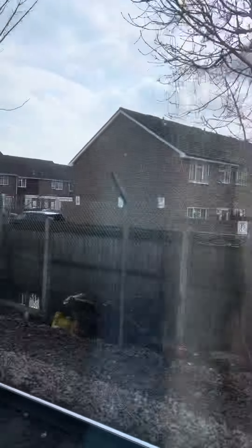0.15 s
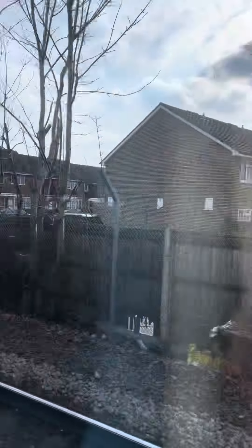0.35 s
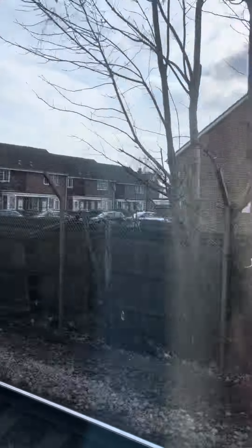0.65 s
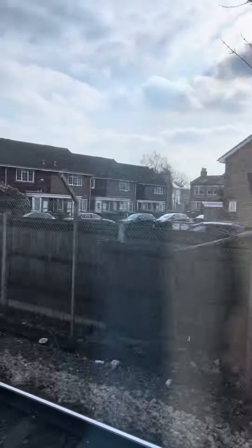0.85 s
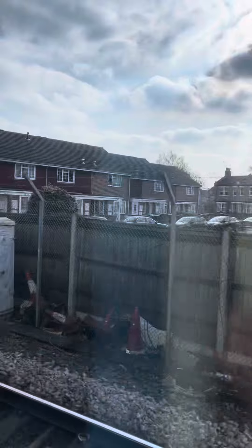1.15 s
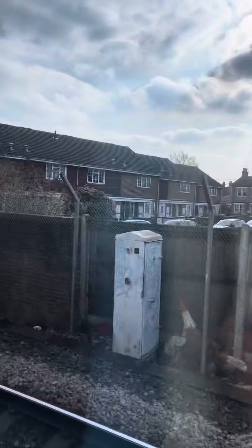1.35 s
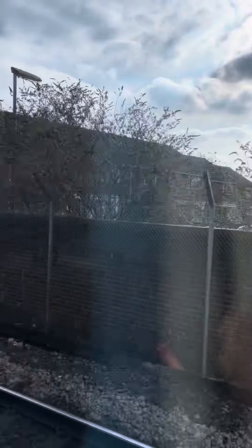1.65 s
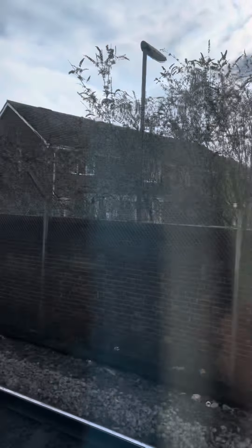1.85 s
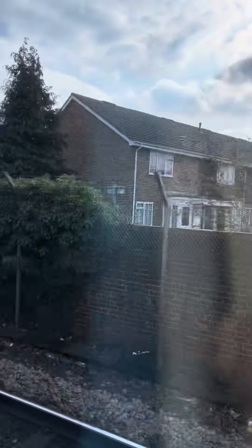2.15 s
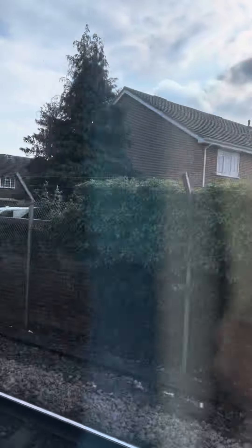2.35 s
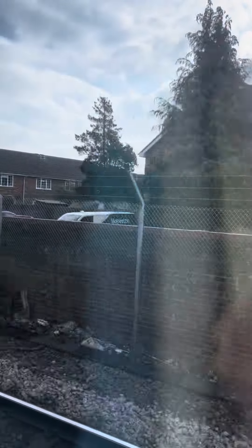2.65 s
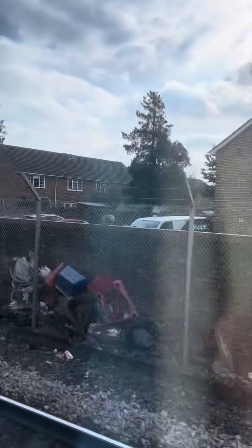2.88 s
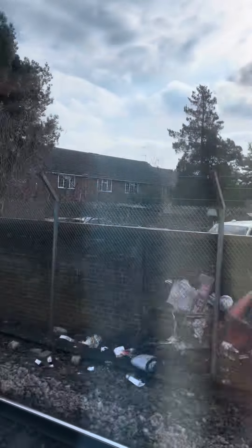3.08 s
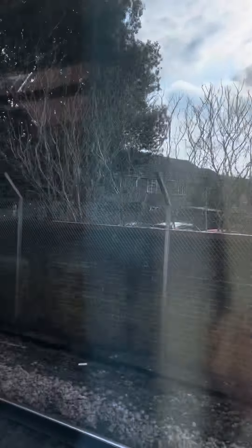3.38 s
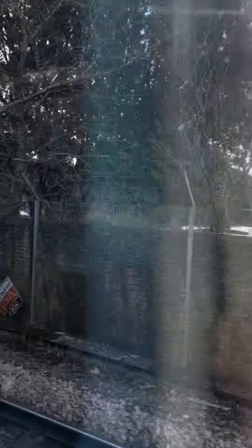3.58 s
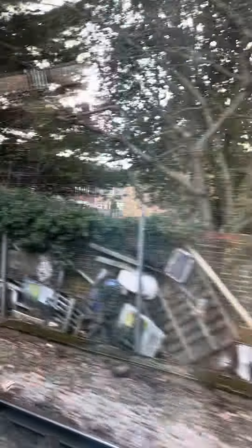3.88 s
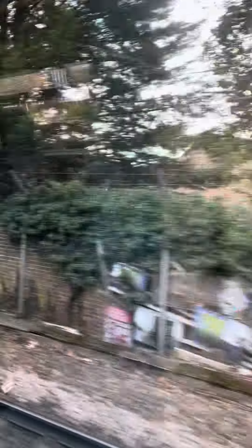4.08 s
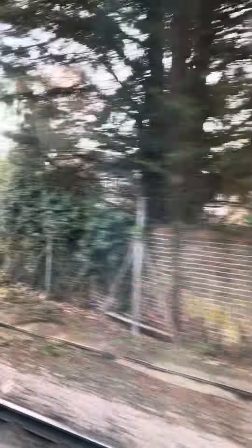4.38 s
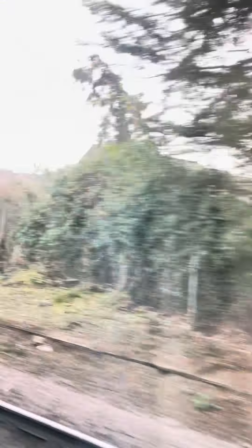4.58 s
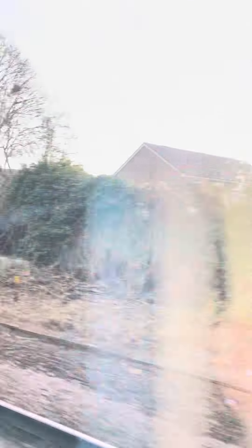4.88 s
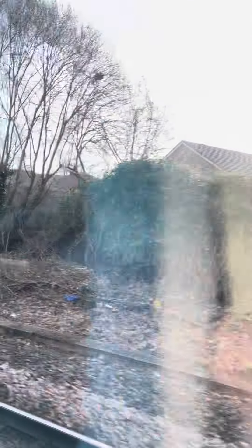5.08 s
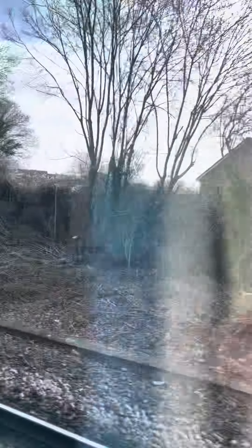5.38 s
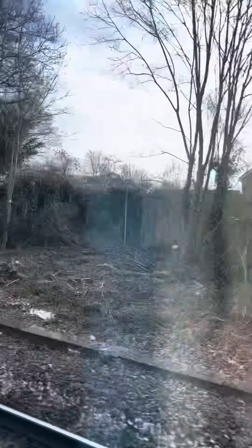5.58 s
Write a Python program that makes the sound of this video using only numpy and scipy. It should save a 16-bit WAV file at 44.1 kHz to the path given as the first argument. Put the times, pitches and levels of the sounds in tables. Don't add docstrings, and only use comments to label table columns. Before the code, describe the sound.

Low, steady rumble and muffled roar inside a moving train carriage, with soft rail-joint thuds, faint air hiss and a latch-like clack at the end.

```python
import sys
import numpy as np
from scipy import signal
from scipy.fft import irfft, next_fast_len
from scipy.io import wavfile
from scipy.ndimage import uniform_filter1d

SR = 44100
rng = np.random.default_rng(int(sys.argv[2]) if len(sys.argv) > 2 else 0)


def persist_wave(psi):
    counts = np.round(np.clip(psi, -1, 1) * 32767).astype(np.int16)
    wavfile.write(sys.argv[1], SR, np.atleast_2d(counts).T)


def boost(x):
    u = np.asarray(x, float) / 20
    return 10 ** u


N = 252693

# start_s (of the peak), level_db, half_length_s, pitch_hz
BOOMS = [(.16, -30.5, 0.11, 61.64), (.34, -29, 0.083, 65.5), (.54, -27, 0.024, 74.4),
         (.65, -25, 0.053, 67.13), (.82, -30.5, .2, 61.85), (1.17, -24.5, .06, 63.2),
         (1.32, -34.5, 0.016, 65.8), (1.41, -25.5, 0.067, 67), (1.59, -30, 0.081, 74.7),
         (1.68, -25, 0.075, 66.2), (1.82, -33.5, 0.049, 66.9), (1.96, -30.5, 0.094, 68),
         (2.3, -29, .1, 69.6), (2.415, -25.5, 0.039, 59.9), (2.71, -24.5, 0.044, 66.04),
         (2.93, -33, 0.22, 67.64), (3.54, -25, 0.091, 67.9), (3.64, -29, 0.035, 66.3),
         (3.77, -39.5, 0.06, 59.4), (3.95, -27.5, 0.038, 71.05), (4.13, -30.5, 0.077, 62.54),
         (4.3, -29.5, .11, 74.2), (4.57, -24.5, 0.066, 71.37), (4.71, -27, .05, 67.3),
         (4.79, -27, 0.07, 66.24), (5.03, -27.5, 0.037, 65.4), (5.12, -32, 0.034, 64.7),
         (5.35, -29, 0.05, 83.3), (5.43, -27, 0.023, 74.96), (5.72, -31, .15, 70.4)]
# start_s, pitch_hz, level_db
HUM = [(0, 42.51, -42), (2, 42.31, -37.5), (4, 42.62, -40), (5.73, 42.35, -36.5)]
# pitch_hz, width_hz, level_db
FAINT_TONES = [(215, 2.1, -48), (477, 6.6, -59.5), (565.2, 30, -52)]
# frequency_hz, density_db (per Hz)
BODY_SPECTRUM = [(18, -31), (27, -8.5), (34, -12.5), (42, -10), (52, -0.5), (62, -5.5), (82, -1.5),
                 (95, -10.5), (120, -28)]
RUMBLE_SPECTRUM = [(70, -25.5), (95, -6.5), (118, -4.5), (145, -1.5), (170, -4.5), (200, -12.5),
                   (240, -27.5)]
ROAR_SPECTRUM = [(150, -32), (200, -0.5), (260, -2), (320, -1), (380, -3), (440, -1.5), (520, -7.5),
                 (570, -6), (660, -10.5), (740, -16.5), (1000, -22), (1500, -40), (2200, -57.5)]
HISS_SPECTRUM = [(1000, -30.5), (1500, -12), (1900, -3.5), (2060, -1), (2300, -4.5), (2800, -10),
                 (3800, -13.5), (4200, -19.5), (4600, -17), (5000, -21), (5900, -27.5), (6200, -33),
                 (8000, -28), (8400, -26), (10500, -27.5), (11800, -34), (12350, -42)]
THUD_SPECTRUM = [(150, -18), (300, -1.5), (450, 0), (600, -0.5), (800, -5), (1000, -15), (1300, -26.5),
                 (1800, -36)]
CHAFE_SPECTRUM = [(4200, -26.5), (4900, -10.5), (5200, 2), (5800, 1.5), (6300, -6.5), (6800, -15.5),
                  (8500, -27)]
RUSTLE_SPECTRUM = [(2500, -0.5), (5000, -1.5), (7000, -11), (7800, -1), (8600, -3), (10000, -0.5),
                   (11500, -6.5), (12400, -19)]
CLACK_SPECTRUM = [(600, -17), (1000, 6.5), (1700, -4), (2200, -3.5), (2700, 0), (3500, -4.5), (4100, -9.5),
                  (7000, -19.5), (9000, -12.5), (11000, -12), (12400, -27)]
RATTLE_SPECTRUM = [(1200, -10), (1500, -1), (1800, 0.5), (2100, -1), (2500, -8), (4000, -17.5), (6000, -34),
                   (8000, -37)]
SCUFF_SPECTRUM = [(6800, -21), (7300, -4.5), (7700, 0), (8100, -1), (8500, -21)]
# frequency_hz, likeness (0-1), right_lag_rad
STEREO = [(20, .9997, 0), (170, .998, 0), (300, .87, 0), (550, .66, 0), (740, .25, 1.5), (900, .38, 3),
          (1150, .1, 5), (1450, .5, 5.8), (1900, .8, 6.3), (2300, .3, 6.3), (3000, .15, 9), (3600, .45, 6.8),
          (4200, .2, 8), (4900, .88, 9.42), (5400, .65, 11.6), (5800, .999, 12.56), (6250, .997, 12.6),
          (6800, .82, 13.5), (8000, .72, 14.9), (8450, .98, 15.6), (9600, .98, 15.8), (10300, .78, 16.5),
          (11350, .7, 17.9), (11750, .999, 18.85)]
# frequency_hz, left_over_right_db
TILT = [(60, .1), (110, .35), (220, .6), (350, 2.7), (480, 2.8), (600, 7), (800, 4.5), (1050, 0),
        (2000, -.7), (4500, 0)]
# start_s, blow_db, floor_ring_db, ring_hz, length_s
JOINTS = [
    (.612, -44.5, -25.5, 181, 0.031),
    (0.787, -40, -37.5, 307.3, 0.07),
    (0.819, -41.5, -33, 211, 0.011),
    (0.974, -35, -34, 311, 0.068),
    (1.128, -30.5, -28, 312.4, 0.052),
    (1.193, -40.5, -33, 324.5, 0.025),
    (1.833, -34, -40, 260, 0.02),
    (1.856, -35, -29, 318, .032),
    (1.9, -41, -37, 300, 0.024),
    (1.997, -44.5, -36, 315, 0.047),
]
# start_s, level_db, rise_s, fade_t60_s
PUFFS = [(.31, -84.5, .02, .3), (.65, -83, .03, 0.33), (.8, -86, .03, .4), (1.1, -80, .05, 0.46),
         (1.34, -77.5, 0.035, 0.31), (1.43, -75, 0.02, 0.33), (1.46, -72, 0.021, 0.23),
         (1.505, -76, .006, .15), (1.53, -78, .015, 0.31), (1.76, -80.5, 0.027, .5),
         (2.14, -74, 0.021, 0.72), (2.3, -83, 0.054, 1.2), (2.559, -72.5, 0.0042, 0.098),
         (2.58, -81, .01, 0.43), (2.8, -77, .04, .5), (3.1, -89.5, .05, 0.89), (3.77, -79.5, 0.019, .4),
         (4.17, -78.5, .015, 1.1), (4.76, -78, 0.039, 0.83), (5.1, -74.5, .02, 0.63),
         (5.525, -79, 0.008, .9)]
# start_s, level_db, rise_s, fade_t60_s
RUSTLES = [(.81, -82, .02, .4), (1.13, -88, .02, .3), (1.46, -75.5, 0.033, 0.28), (1.85, -77, .01, .3),
           (2.29, -79.5, 0.021, .3), (3.3, -86, 0.0048, 0.16), (3.37, -77, 0.019, .3), (3.69, -86, .01, .2),
           (4.25, -80.5, .01, .25), (4.69, -78, .01, .2), (4.85, -76, .008, 0.24)]
# start_s, level_db, rise_s, fade_t60_s
TICK_TAILS = [
    (1.789, -70.5, 0.00042, .04),
    (2.563, -65, 0.00092, 0.083),
    (5.448, -52, .0003, 0.02),
    (5.452, -68, .002, .12),
    (5.652, -48.5, 0.00045, 0.091),
    (5.66, -50, .004, 0.24),
    (5.718, -66, .002, .1),
]
# start_s, main_ring_db, main_ring_hz, second_ring_hz (9 dB weaker), fade_t60_s
SNAPS = [(1.79, -58, 4600, 9750, 0.0039), (1.789, -42, 1300, 1500, .015), (1.789, -60.5, 3300, 3700, .015),
         (2.567, -56, 3450, 3150, 0.03), (2.563, -65, 5400, 6100, .02), (2.564, -57.5, 2550, 4400, .025),
         (5.4483, -52, 3800, 6000, 0.006), (5.4484, -55, 10600, 7500, .006),
         (5.4484, -58, 7400, 8600, .005), (5.4476, -53, 1300, 2600, .008), (5.653, -38, 1650, 2800, 0.024),
         (5.654, -43.5, 2460, 3600, .02), (5.652, -58, 12300, 8500, .02), (5.664, -46.5, 1900, 3650, .04),
         (5.652, -58, 5500, 7200, 0.011), (5.6535, -44, 2100, 3300, .025), (5.652, -46, 11100, 10340, .016),
         (6.2, -43, 2540, 3400, .04), (6.1, -46.5, 2400, 3000, 0.041), (5.684, -53, 1900, 3400, .04)]
# start_s, pitch_hz, level_db
WHINE = [(0, 2110, -70.5), (.8, 2140, -66), (1.2, 2050, -71.5), (2, 2090, -77.5), (2.7, 2050, -67),
         (3.5, 2080, -74), (4.8, 2050, -77.5), (5.73, 2050, -76)]
# start_s (of the peak), level_db, half_length_s, pitch_hz
SQUEALS = [
    (2.2, -92, .08, 11000),
    (2.35, -90, .1, 11700),
    (2.52, -90, .1, 11600),
    (2.67, -89, .1, 11450),
    (2.8, -92, .06, 11100),
    (5.53, -88.5, .04, 10300),
    (5.59, -86, 0.065, 10150),
]
# start_s (of the peak), level_db, half_length_s, pitch_hz
GEAR = [(.07, -49, .25, 468), (.68, -42, 0.24, 469), (1.34, -41.5, 0.13, 474), (1.96, -47, 0.093, 465),
        (2.16, -39.5, 0.28, 470), (2.55, -44, .1, 468), (3.05, -39.5, 0.22, 472), (3.43, -38.5, 0.044, 462),
        (3.65, -43, .3, 468), (4.06, -40.5, 0.33, 473), (4.62, -46, 0.25, 471), (5.08, -41, 0.27, 471),
        (5.68, -42, 0.26, 473)]
# start_s (of the peak), level_db, half_length_s
LURCHES = [(0, -32.5, 0.22), (.51, -37.5, 0.1), (.65, -31.5, 0.075), (.83, -31.5, 0.056),
           (1.18, -30.5, 0.11), (1.35, -33, 0.055), (1.5, -34, 0.08), (1.655, -30.5, .05), (1.9, -33, 0.18),
           (2.34, -26.5, 0.057), (2.51, -36.5, .08), (2.645, -28, 0.025), (2.99, -33.5, 0.099),
           (3.42, -39.5, 0.076), (3.63, -34.5, 0.083), (3.87, -31.5, 0.065), (4.36, -36, .2),
           (4.53, -36.5, 0.068), (4.7, -33.5, 0.13), (4.96, -35, 0.1), (5.29, -35, .13),
           (5.73, -34.5, 0.21)]
# start_s, level_db (about its mean)
LOAD = [(0, -4), (.14, -.5), (.4, -1), (.51, 1), (.83, 1), (1.07, 1), (1.2, -0.5), (1.3, 1), (1.66, 0),
        (2.04, 1.5), (2.42, 2), (2.7, -1), (3.0, 0), (3.5, 1), (3.64, -1.3), (4.0, 0.5), (4.9, -0.5),
        (5.73, 0.2)]
# start_s, level_db, rise_s, fade_t60_s
RATTLES = [
    (.79, -62.5, 0.0091, .4),
    (.97, -60, 0.0099, .4),
    (1.112, -56, .02, 0.5),
    (1.83, -67, .008, 0.45),
    (1.993, -59.5, .01, 0.39),
]
# pitch_ratio (to the ring), level_db
PANELS = [(0.999, 1.5), (1.1, -10.5), (1.4, -10), (1.85, -12), (2.3, -20.5)]
# start_s, low_ring_db, low_ring_hz, high_ring_hz, fade_t60_s
KNOCKS = [(.087, -41.5, 500, 700, .045), (.201, -40, 580, 800, .05), (.503, -36, 460, 650, .05),
          (.674, -36, 480, 700, .045), (.785, -35, 420, 850, .06), (.803, -35, 630, 1085, 0.09),
          (.926, -38.5, 544, 650, 0.056), (.992, -37.5, 765, 960, .06), (1.012, -35.5, 560, 890, .05),
          (1.131, -32, 570, 843, .06), (1.147, -30, 790, 1010, .1), (1.163, -33, 570, 914, .06),
          (1.18, -35.5, 616, 996, .05), (1.498, -38.5, 480, 695, 0.043), (1.715, -38, 480, 676, .05),
          (1.789, -38, 800, 1050, .02), (5.313, -34, 634, 710, .055), (1.834, -32.5, 540, 830, .05),
          (1.841, -28, 500, 643, .08), (1.853, -33, 600, 820, 0.044), (1.862, -29, 580, 720, 0.084),
          (1.87, -34, 755, 997, 0.048), (1.877, -33, 434, 910, 0.046), (1.924, -35.5, 440, 617, 0.036),
          (2.006, -36.5, 545, 806, .05), (2.269, -37.5, 502, 700, .05), (2.518, -40, 500, 700, 0.048),
          (2.807, -41, 480, 700, 0.049), (4.277, -39, 490, 700, 0.044), (4.924, -41, 496, 720, 0.049),
          (5.147, -38.5, 490, 720, .05), (5.621, -40, 520, 750, .04)]
# start_s, level_db, rise_s, fade_t60_s
SCUFFS = [
    (.8, -86, .03, 0.27),
    (1.47, -84, .06, .25),
    (1.535, -83, .015, .1),
]
# start_s (of the peak), level_db, half_length_s, pitch_hz
SQUEAKS = [
    (2.165, -76, .04, 6250),
    (2.2, -80, .04, 6100),
    (1.485, -74, .03, 3750),
    (1.36, -75, .04, 3600),
    (2.57, -70, .012, 3400),
    (5.13, -80, .04, 6100),
]


def evened(x):
    return x / np.sqrt(np.mean(x ** 2) + 1e-20)


def read(points, hz, column=1):
    rows = np.transpose(points)
    return np.interp(np.log(hz + 1), np.log(rows[0] + 1), rows[column], left=rows[column][0])


def curves(rows):
    s, *columns = np.transpose(rows)
    return [np.interp(np.arange(N) / SR, s, c) for c in columns]


def after(s, seconds):
    start = int(np.ceil(s * SR))
    span = slice(start, min(start + int(seconds * SR), N))
    return span, np.arange(span.start, span.stop) / SR - s


def noise(shape):
    size = next_fast_len(N)
    hz = np.fft.rfftfreq(size, 1 / SR)
    a, b, c, d = rng.standard_normal((len(hz), 4)).T
    likeness = np.clip(read(STEREO, hz), 0, 1)
    tilt = boost(read(TILT, hz) / 2)
    left = a + 1j * b
    unlike = np.sqrt(1 - likeness ** 2) * (c + 1j * d)
    right = likeness * left * np.exp(-1j * read(STEREO, hz, column=2)) + unlike
    pair = irfft(np.array([left * tilt, right / tilt]) * shape(hz), size)[:, :N]
    return pair / np.sqrt(np.mean(pair.mean(0) ** 2))


def coloured(points):
    return noise(lambda hz: boost(read(points, hz)) * (hz > points[0][0]) * (hz < points[-1][0]))


def flutter(hz, depth_db):
    lowpass = signal.butter(2, hz, fs=SR, output="sos")
    wander = signal.sosfiltfilt(lowpass, rng.standard_normal(N))
    return boost(depth_db * evened(wander))


def steadied(x, seconds, share):
    power = uniform_filter1d((x ** 2).mean(0), int(seconds * SR))
    out = x / (abs(power) + 1e-3) ** (share / 2)
    return out / np.sqrt(np.mean(out.mean(0) ** 2))


def patchy(x, depth_db, bins, frames):
    z = signal.stft(x, nperseg=512)[2]
    patches = rng.standard_normal(z.shape[:0:-1]).T
    patches = uniform_filter1d(uniform_filter1d(patches, bins, 0), frames, 1)
    return signal.istft(z * boost(depth_db * evened(patches)), nperseg=512)[1][:, :N]


def bursts(rows):
    power = np.zeros(N)
    for s, db, rise, t60 in rows:
        span, age = after(s, rise + t60)
        fade = boost(db - 60 * np.maximum(age - rise, 0) / t60)
        power[span] += (np.minimum(age / rise, 1) * fade) ** 2
    return np.sqrt(power)


def swells(rows, rest_db):
    s, db, half, *hz = np.transpose(rows)[:, :, None]
    t = np.arange(0, N + 64, 64) / SR
    power = boost(2 * (db - 12.5 * np.abs((t - s) / half) ** 1.073))
    level_db = 10 * np.log10(power.sum(0) + boost(2 * rest_db))
    weight = power + 1e-99
    pitch = [(f * weight).sum(0) / weight.sum(0) for f in hz]
    return [np.interp(np.arange(N) / SR, t, c) for c in pitch + [level_db]]


def tone(hz, db):
    return np.sqrt(2) * boost(db) * np.sin(2 * np.pi * np.cumsum(hz) / SR)


def whistle(hz, db, width, steady):
    a, b = rng.standard_normal((N, 2)).T
    r = np.exp(-np.pi * width / SR)
    fuzz = signal.lfilter([1], [1, -2 * r, r * r], a + 1j * b)
    fuzz = fuzz / np.abs(fuzz) ** steady
    carrier = np.exp(2j * np.pi * np.cumsum(hz) / SR)
    return boost(db) * evened((fuzz * carrier).real)


def ring(db, hz, t, lag):
    return boost(db) * np.sin(2 * np.pi * hz * t - np.array([[0], [1]]) * lag)


def struck(rows, lag_of):
    out = np.zeros((2, N))
    for s, db, hz, second_hz, t60 in rows:
        span, t = after(s, 2 * t60)
        rings = ring(db, hz, t, lag_of(hz)) + ring(db - 9, second_hz, t, lag_of(second_hz))
        build_up = 1 - np.exp(-t * hz / 0.6)
        out[:, span] += rings * boost(-60 * t / t60) * build_up
    return out


def vents():
    load_db, = curves(LOAD)
    trim = boost(8.5) * bursts([*PUFFS, *RUSTLES])
    level = np.hypot(boost(-65.5 + 0.27 * load_db), trim)
    return level * flutter(5.9, depth_db=1.19) * patchy(coloured(HISS_SPECTRUM), 1.3, 5, 12)


def machinery():
    def resonances(hz):
        return sum(boost(db) / np.sqrt(width) / (1 + (2 * (hz - f) / width) ** 2)
                   for f, width, db in FAINT_TONES)

    gear = whistle(*swells(GEAR, rest_db=-62.5), 16, steady=.5)
    return tone(*curves(HUM)) + boost(-48.5) * noise(resonances) + gear * boost([[1.2], [-3.2]])


def fittings():
    chafe = bursts(PUFFS) * coloured(CHAFE_SPECTRUM) * flutter(60, depth_db=1.7) * boost(-.4)
    scuffs = bursts(SCUFFS) * coloured(SCUFF_SPECTRUM)
    squeaks = whistle(*swells(SQUEAKS, rest_db=-120), 300, steady=.3)
    rustles = bursts(RUSTLES) * coloured(RUSTLE_SPECTRUM)
    tails = bursts(TICK_TAILS) * steadied(coloured(CLACK_SPECTRUM), .01, 0.51)
    return chafe + scuffs + squeaks + rustles + tails


def snaps():
    return struck(SNAPS, lambda hz: read(STEREO, hz, column=2))


def knocks():
    return struck(KNOCKS, lambda hz: 2 * np.pi * hz * .00012)


def joints():
    blow, floor_ring = np.zeros((2, N))
    for s, blow_db, ring_db, hz, length in JOINTS:
        span, age = after(s, .5)
        tail = np.maximum(age - length, 0)
        blow[span] += np.minimum(age / 0.0069, 1) * boost(blow_db - 100 * age - 790 * tail)
        panels = sum(boost(db) * np.sin(2 * np.pi * k * hz * age) for k, db in PANELS)
        floor_ring[span] += np.minimum(age / 0.011, 1) * boost(ring_db - 1500 * tail) * panels
    thuds = blow * steadied(coloured(THUD_SPECTRUM), 0.046, 0.74)
    rattles = bursts(RATTLES) * coloured(RATTLE_SPECTRUM)
    return thuds + rattles + floor_ring * boost([[1.2], [-1.2]])


def body():
    boom = boost(-0.5) * tone(*swells(BOOMS, rest_db=-44.5)) * boost([[.1], [-.1]])
    return boom + boost(-35.5) * steadied(coloured(BODY_SPECTRUM), 0.11, 0.43)


def wheels():
    load_db, = curves(LOAD)
    rumble_db = swells(LURCHES, rest_db=-37)[0] + 0.37 * load_db
    rumble = boost(rumble_db) * steadied(coloured(RUMBLE_SPECTRUM), 0.083, 0.74)
    roar = boost(-38 + load_db) * flutter(3.7, depth_db=0.68) * steadied(coloured(ROAR_SPECTRUM), 0.31, 0.27)
    whine = whistle(*curves(WHINE), 170, steady=0.25)
    squeal = whistle(*swells(SQUEALS, rest_db=-120), 60, steady=.2)
    return rumble + roar + whine + squeal


def scene():
    return vents() + machinery() + fittings() + snaps() + knocks() + joints() + body() + wheels()


def top_cut(x):
    return signal.sosfilt(signal.butter(12, 12850, fs=SR, output="sos"), x)


def record(dry):
    return top_cut(dry)


dry = scene()
out = record(dry)
persist_wave(out)
```